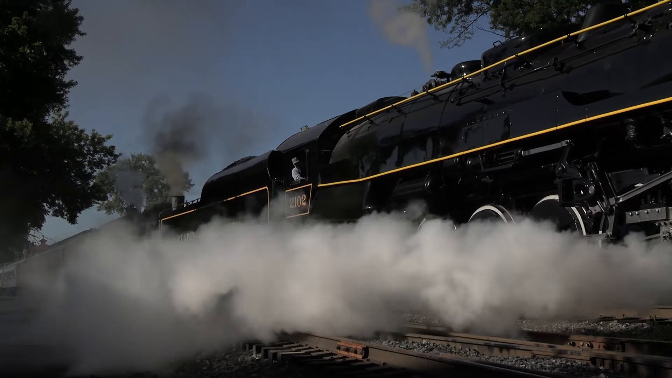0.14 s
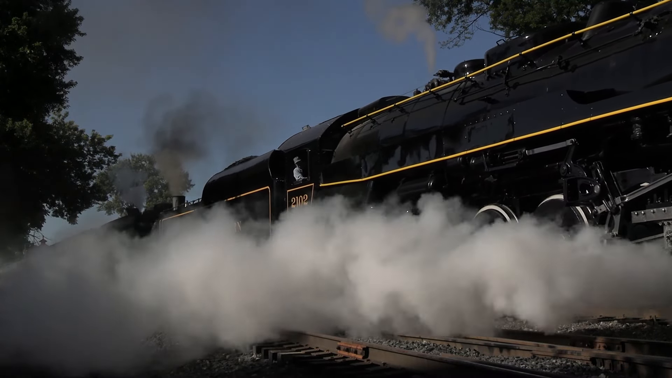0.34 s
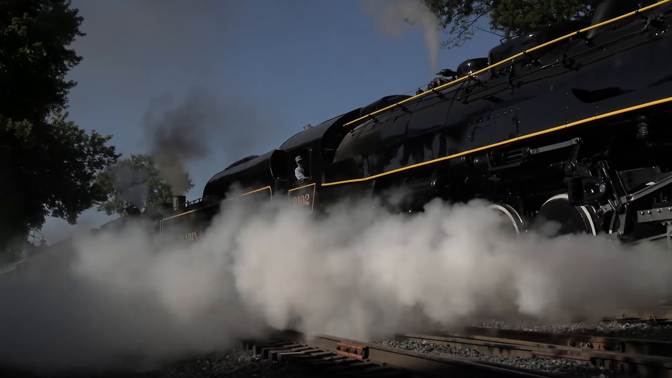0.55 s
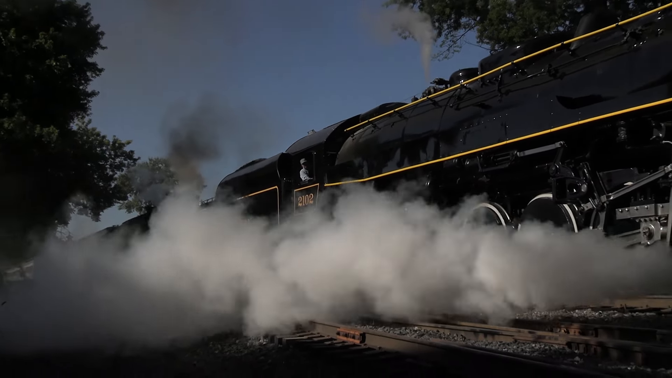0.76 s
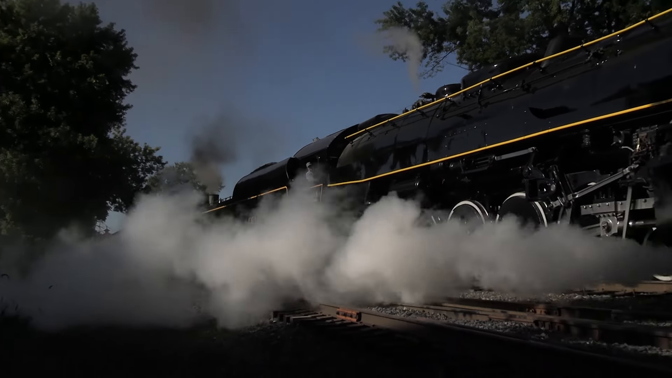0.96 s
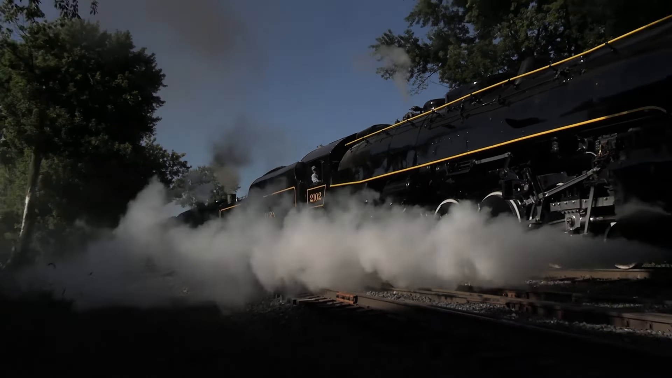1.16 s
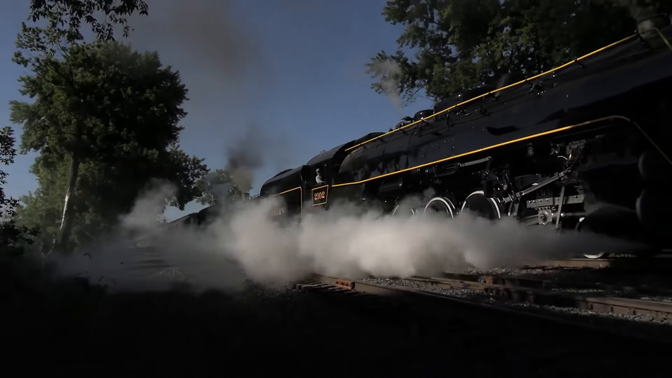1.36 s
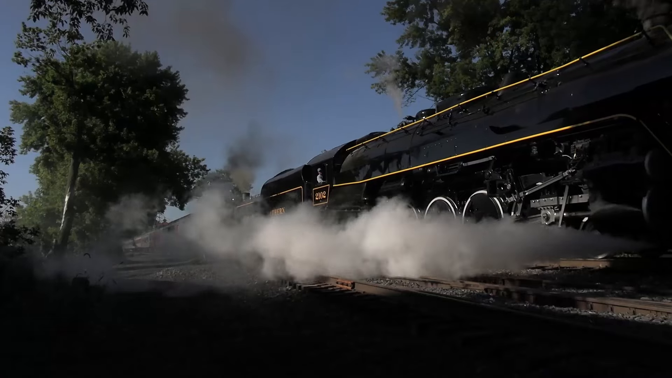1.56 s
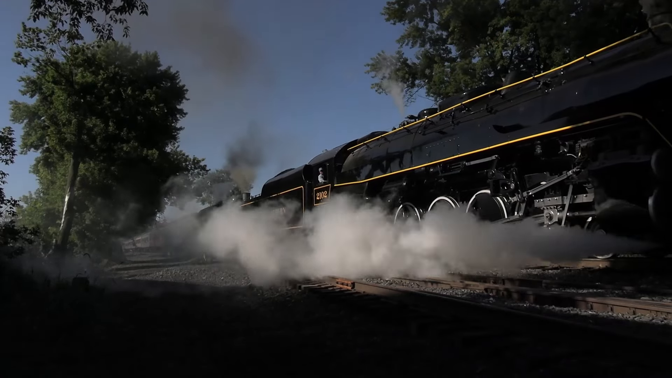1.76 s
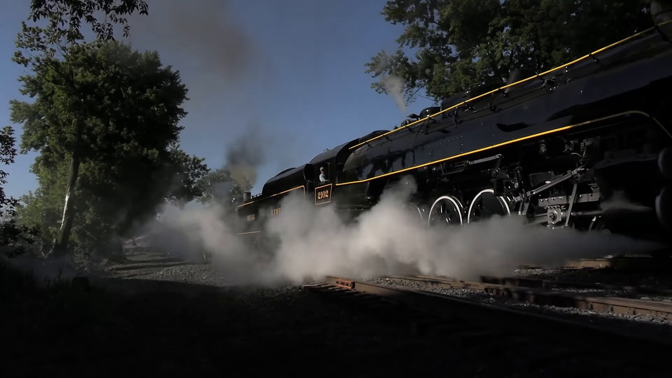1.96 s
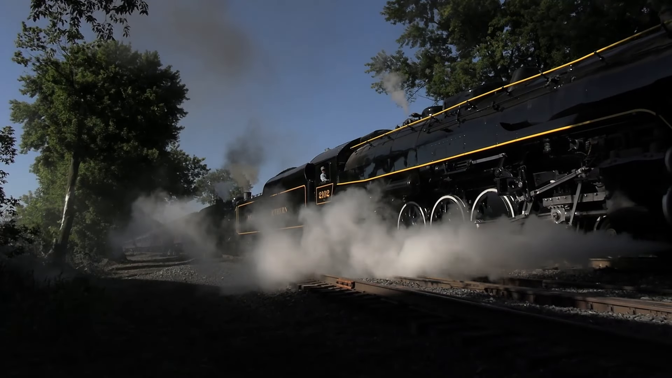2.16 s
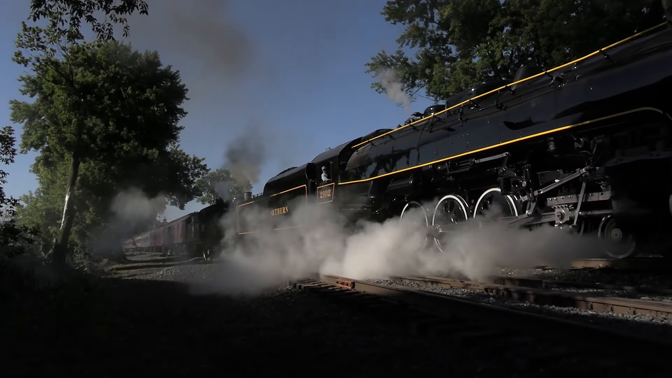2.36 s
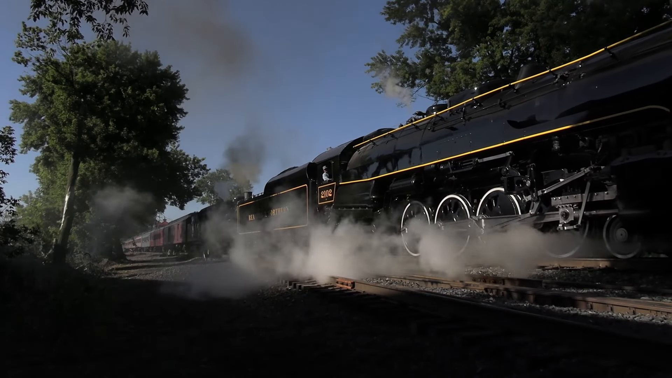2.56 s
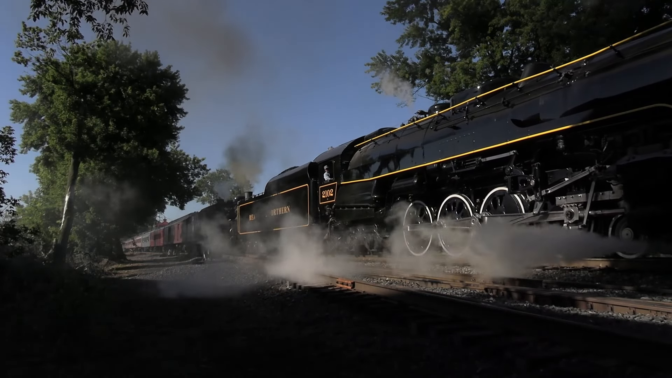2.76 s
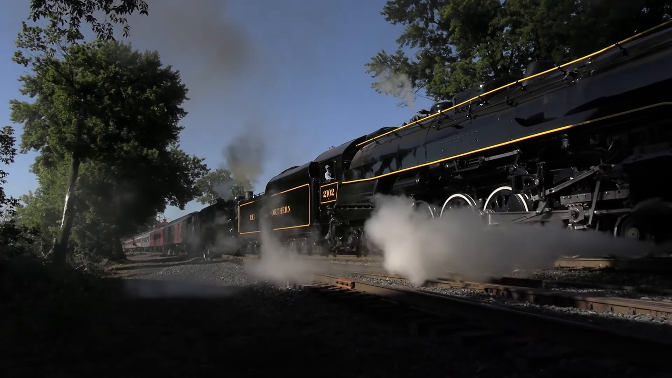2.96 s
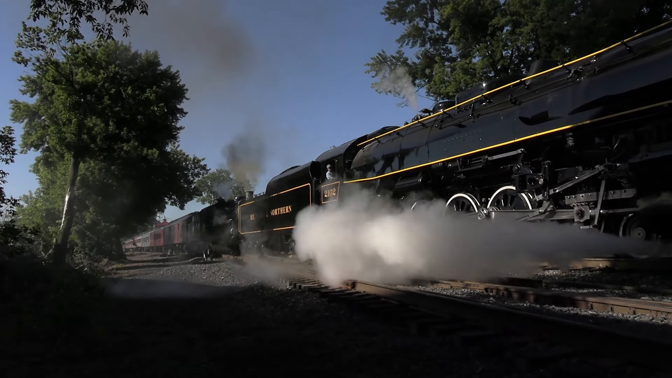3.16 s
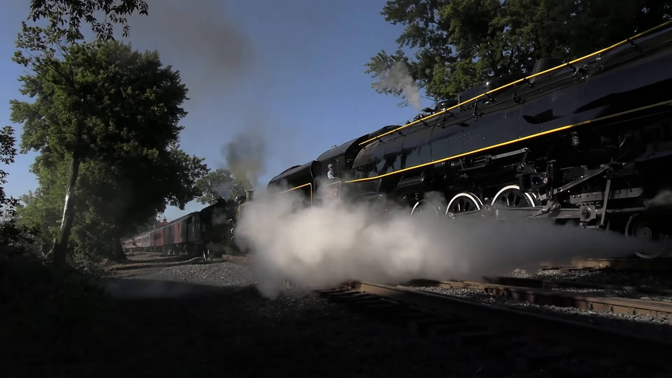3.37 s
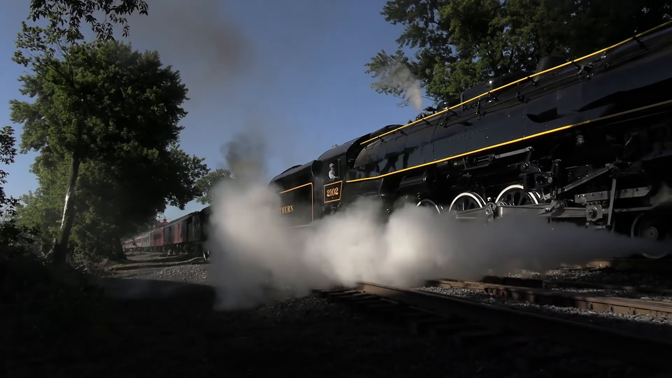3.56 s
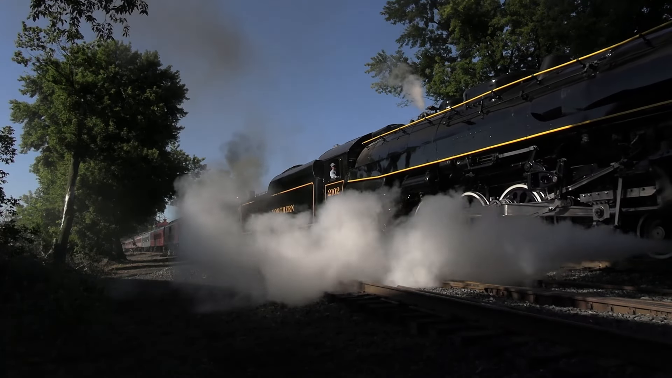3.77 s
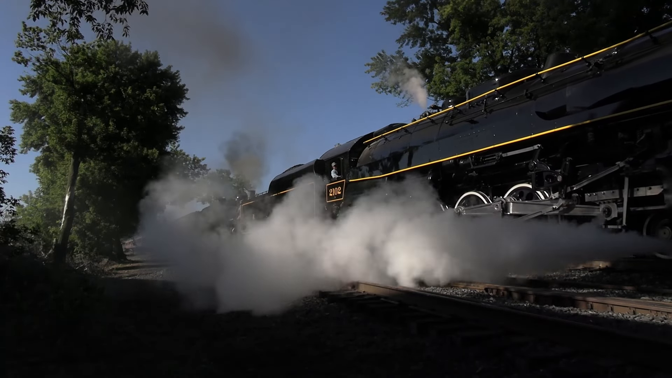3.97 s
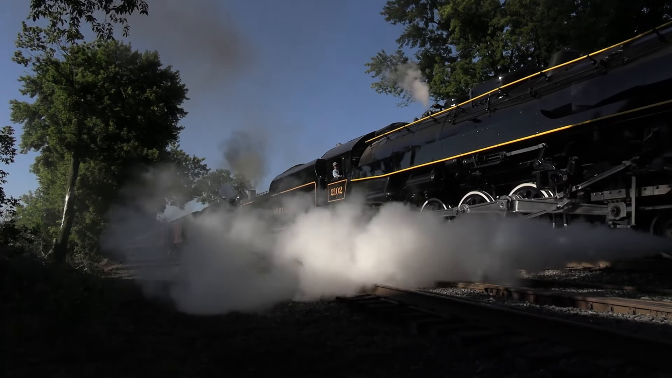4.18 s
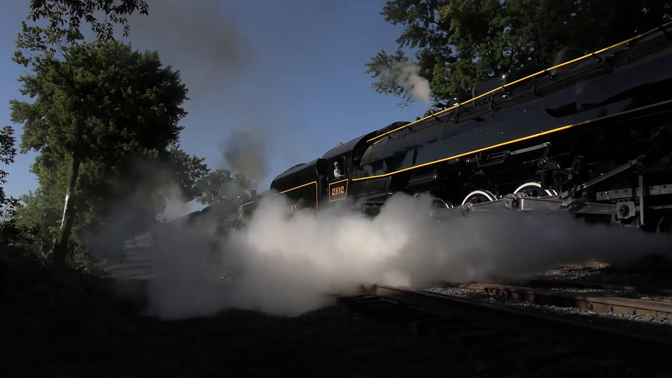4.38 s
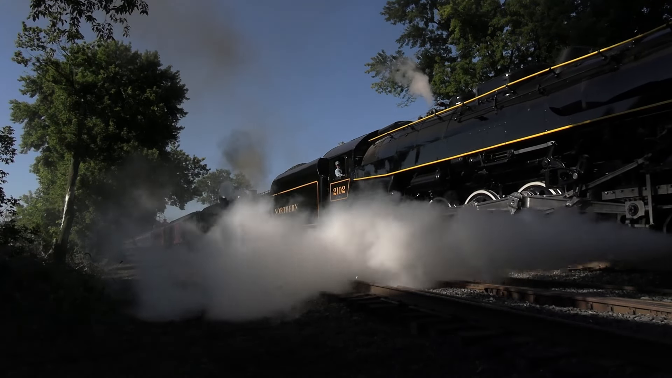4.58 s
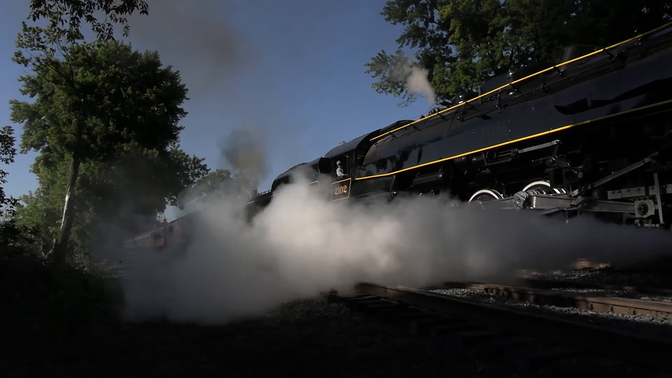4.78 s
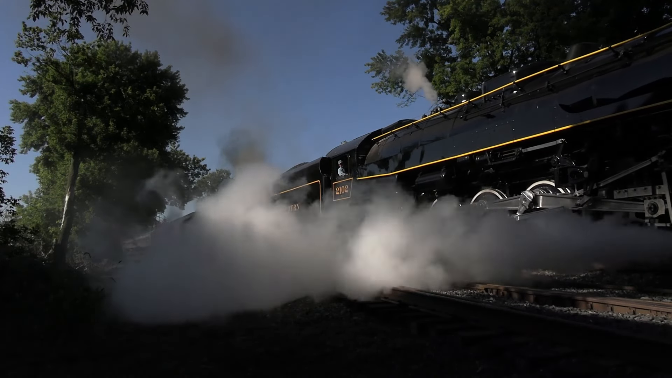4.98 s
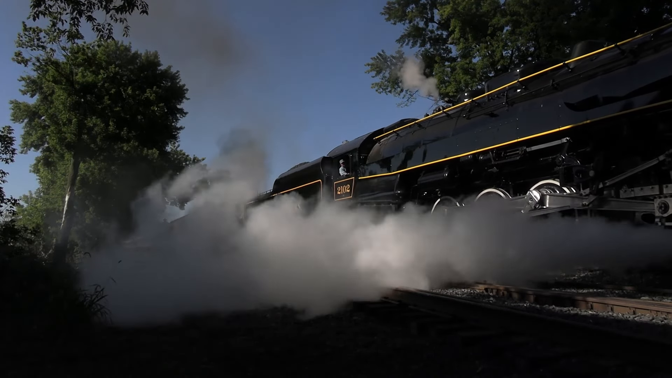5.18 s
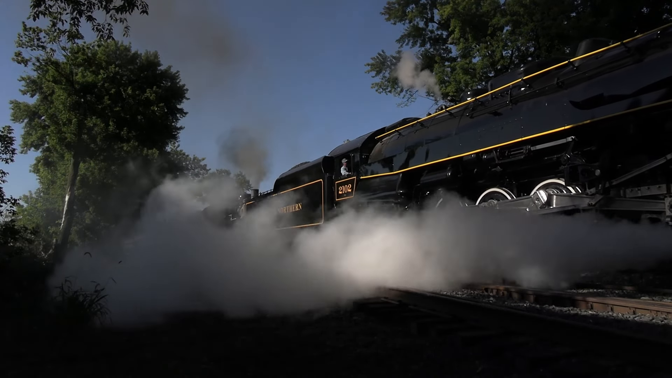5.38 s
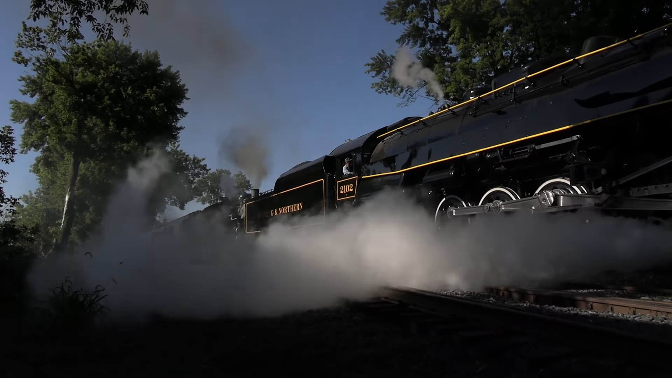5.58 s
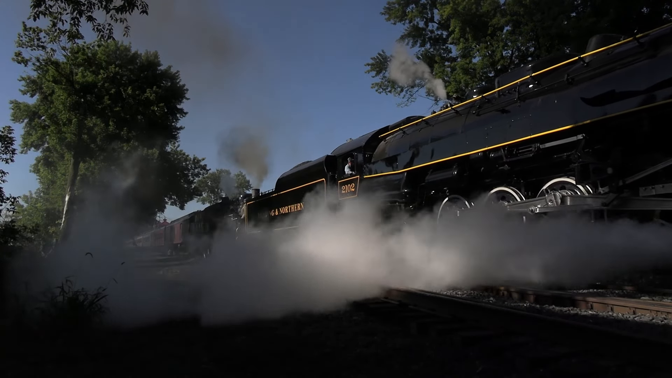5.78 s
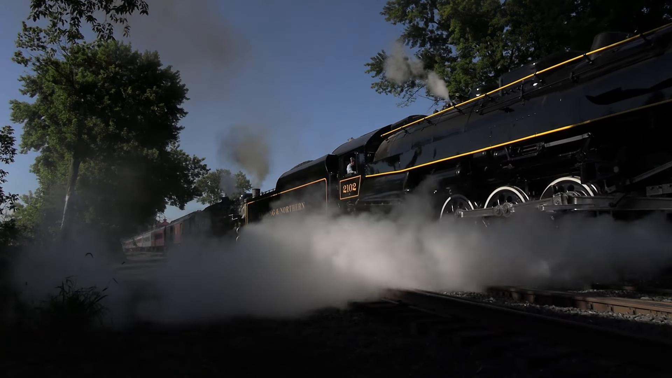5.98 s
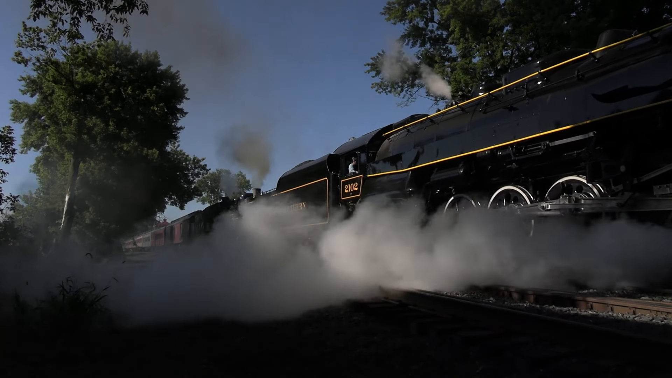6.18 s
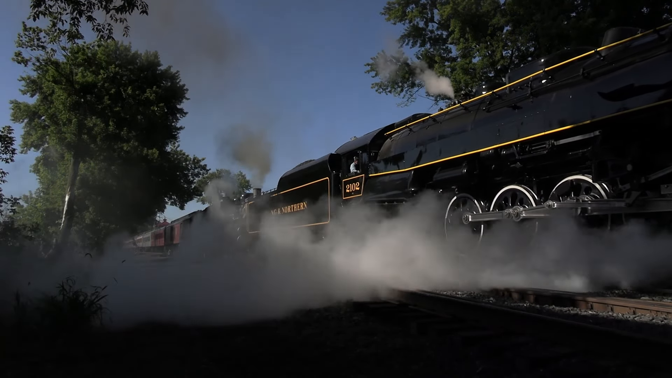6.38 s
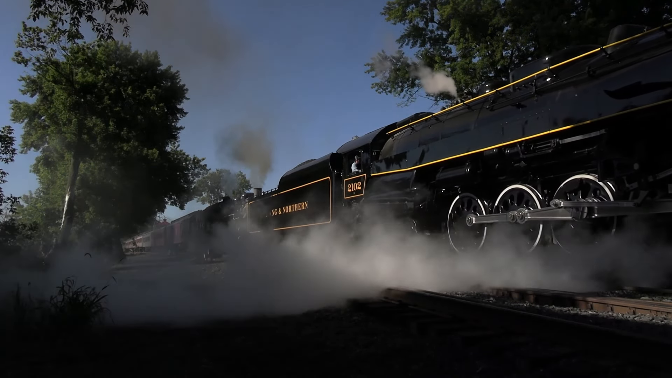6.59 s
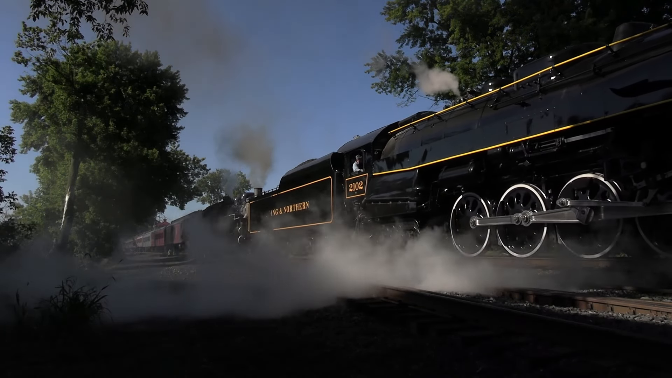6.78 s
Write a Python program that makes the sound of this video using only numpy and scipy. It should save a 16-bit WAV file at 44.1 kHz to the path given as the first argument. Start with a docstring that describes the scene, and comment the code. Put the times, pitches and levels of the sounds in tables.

```python
"""A steam locomotive creeps past with its cylinder cocks open, over the rumble of boiler and wheels.
First the rear cock blows: band-split turbulent noise, with running-gear knocks and a soft stack chuff.
Near 2.8 s the front cock opens with a whoosh; its jet surges, flickers and half whistles as the pressure sags.
Near 6.5 s a chuff sounds and the rear jet returns, until the end. Gliding echoes comb both jets throughout."""
import sys
import numpy as np
from scipy import signal
from scipy.fft import rfft, irfft
from scipy.io import wavfile
from scipy.ndimage import uniform_filter1d

SR = 44100
rng = np.random.default_rng(int(sys.argv[2]) if len(sys.argv) > 2 else 0)


def dump_mix(stems):
    """Bounce the given channels to the path in sys.argv[1] as a 16-bit WAV at rate SR."""
    frames = np.atleast_2d(stems).T  # one column per channel
    limited = np.clip(frames, -1, 1)  # hard clip at full scale
    pcm = np.round(limited * 32767).astype(np.int16)
    wavfile.write(sys.argv[1], SR, pcm)


N = 301644
TIME = np.arange(N) / SR
FREQS = np.maximum(np.fft.rfftfreq(N, 1 / SR), 1)

# Boiler and wheels, before the fixed gains of roar and hum: t/s, level/dB
RUMBLE_LEVEL = [(0.0, -62), (.4, -67), (.9, -72), (1.25, -68), (2.1, -73), (2.5, -68), (3.1, -69),
                (3.7, -70), (4.45, -66.5), (5.1, -72), (5.9, -71), (6.3, -75.5), (6.5, -73), (6.84, -62)]
# Relative spectral density of the rumble: f/Hz, level/dB
RUMBLE_SPECTRUM = [(25, -28), (50, -15), (85, -3), (150, 4), (260, -4.5), (340, 0), (450, 2.5), (700, -25)]
# Knocks of the running gear: t/s, level/dB, f/Hz, width/Hz, decay/s
GEAR_KNOCKS = [(.005, -58, 190, 90, .05), (.165, -61, 200, 90, .035), (.277, -35.5, 1730, 150, .016),
               (1.27, -68, 140, 80, .05), (2.315, -59, 335, 140, 0.025), (2.345, -63, 105, 40, .03),
               (2.945, -53, 360, 140, 0.017), (6.484, -45, 940, 150, 0.013), (6.49, -48, 1420, 120, .04)]
# Puffs of exhaust and the whoosh of a valve opening:
# t/s, level/dB, rise/s, decay/s, boom f/Hz, then boom, ring and bark re the puff/dB
PUFFS = [(2.185, -52, 0.15, 0.091, 204, -6, -6.5, -25), (2.755, -62, 0.045, 0.089, 142, -.5, -2.5, 16.5),
         (6.452, -53.3, 0.078, 0.12, 290, -5.5, -10.5, 2.5)]
# Relative spectral density of the puffs: f/Hz, level/dB
PUFF_SPECTRUM = [(40, -26), (85, -1.5), (150, -7), (330, 1.5), (490, 2.5), (600, -5), (1000, -12),
                 (1600, -30)]
# Stack and smokebox resonances, each applied twice: f/Hz, width of one pass/Hz, relative level/dB
STACK_MODES = [(129, 120, -6), (426, 62, 7)]
# Half whistles of the jet: t/s, length/s, f/Hz, width/Hz, level/dB
WHISTLE_TONES = [(0.08, .17, 3210, 650, -36.5), (.8, .2, 2950, 130, -44), (1.12, .3, 2870, 120, -46),
                 (3.12, 0.28, 3000, 600, -42), (4.7, 0.28, 2720, 380, -43.5), (5.35, 0.38, 2880, 200, -50),
                 (5.88, .35, 2920, 160, -48), (6.72, 0.3, 3370, 200, -55)]
# Strokes blown through each cock: opens t/s, closes t/s, hiss level/dB, hold/s, sag/(dB/s), most sag/dB
REAR_BLOWS = [(-.05, 2.79, -31, 0.18, 4, 7.5), (6.48, 7.0, -38.5, .5, 3.7, 7.4)]
FRONT_BLOWS = [(2.8, 6.48, -33, 1.75, 3.65, 9.5)]
# Relative spectral density of each jet before its bands are levelled: f/Hz, level/dB
REAR_SPECTRUM = [(40, -55), (260, -26), (340, -20), (440, -13.5), (560, -15.5), (750, -7.5), (900, -9),
                 (1150, -6), (1800, -4), (2450, -3), (3100, -1.5), (4500, -2.5), (6500, -3.5), (8500, -7),
                 (10700, -9), (16000, -25)]
FRONT_SPECTRUM = [(40, -64), (290, -23), (400, -17), (480, -18.5), (600, -10), (720, -11), (850, -7.5),
                  (1000, -4.5), (1200, -3.5), (1500, -2), (2000, 0.5), (2900, 1.3), (3400, -0.5),
                  (3800, -1), (4700, -3.5), (6600, -2.5), (8800, -7.5), (10900, -6.5), (13000, -15.5),
                  (16000, -23.5)]
# Paths to the two microphones: f/Hz, common share (0-1), left minus right level/dB, left lag/rad
REAR_STEREO = [(300, 1, 0, -0.3), (1100, 0.84, -2.5, -0.26), (2200, 0.38, -2, 0.34), (3180, 0.31, -4, 1),
               (4360, 0.2, -2.5, 0.058), (6700, 0.22, -4.5, 0.28), (10500, 0.62, -3, -0.58),
               (15000, .45, -2.5, -0.44)]
FRONT_STEREO = [(300, 0.75, -1.5, 0.14), (1100, 0.89, -1.5, 0.44), (2170, 0.8, -3, 1.2),
                (3200, 0.42, -5.5, 1.97), (4360, 0.044, -3, 1.3), (6400, 0.1, -8, 3.4),
                (8500, 0.52, -2, 5.2), (10500, 0.62, -4, 6.4), (15000, .6, -1, 6.5)]
# The rear cock swings to the right, then slightly back: t/s, left minus right level/dB
REAR_BALANCE = [(0, 1.5), (2.7, -0.5), (6.84, -0.2)]
# Gliding echo delays: t/s, ballast delay/ms, rail-bed delay/ms
REAR_GROUND = [(0, 2.6, 3.2), (1.2, 2.9, 3.22), (2.0, 2.1, 3.5), (2.7, 2.2, 3.5), (6.84, 3.8, 4)]
FRONT_GROUND = [(2.8, 2.7, 3.7), (3.5, 3.35, 3.7), (4.2, 3.4, 4.25), (5.0, 3.56, 4.45), (6.399, 3.9, 4.65)]
# Steady reflections close to the microphones: delay/ms, gain
CLOSE_REFLECTIONS = [(0.702, 0.017), (0.978, 0.056)]
# Drain pipes ringing under the jets: f/Hz, width/Hz, level re the plain hiss/dB
PIPE_MODES = [(1706, 40, -14), (2830, 100, -15), (3270, 140, -14)]
# Surges and chokes of the whole jet: t/s, length/s, level/dB
FLOW_SURGES = [(.07, 0.13, 0), (1.35, 0.34, 1), (1.72, 0.2, 1), (2.785, .04, -1), (2.848, 0.1, 3.5),
               (2.99, 0.034, -2), (3.24, .08, 0.5), (3.66, 0.19, -0.2), (4.1, 0.092, 2), (4.39, .05, 2),
               (4.46, .06, -1), (4.6, .05, 1), (4.7, 0.17, 2), (4.84, .05, 1), (5.04, 0.18, -0.8),
               (5.62, 0.36, 0.6), (5.85, 0.051, 2), (6.02, .05, 1), (6.11, .04, 0.8), (6.3, 0.53, -2.5)]
# Quick flickers of the fizz, mostly brighter and a few duller: t/s, length/s, fizz level/dB
FIZZ_FLICKERS = [(2.95, .03, 1), (3.26, 0.13, 2.5), (3.38, .04, 3.5), (3.47, .07, 3.5), (4.0, .05, 2.5),
                 (4.08, .07, 2), (4.21, 0.072, 3.5), (4.36, 0.063, 3), (4.67, 0.052, 2), (5.39, 0.12, 1.5),
                 (5.54, .05, 0), (5.77, .04, -1.5), (5.84, 0.038, -1.5), (5.92, 0.046, 1.5),
                 (6.01, .035, 1), (6.09, 0.047, 2), (6.17, 0.036, 1.5), (6.3, .05, 4.5)]
# The fizz dulls for a moment: t/s, length/s, level/dB
FIZZ_DULLINGS = [(2.33, 0.17, -3.2), (2.62, 0.46, -1.5), (2.795, .04, 0), (3.53, .05, -3),
                 (4.53, 0.24, -1.5), (5.14, 0.039, -4), (5.72, .06, -1.5), (5.8, .03, -1),
                 (5.97, .04, -2.5), (6.05, .03, -2), (6.23, .06, -0.5), (6.6, 0.37, -2)]
# The front jet sounds hollow for a while: t/s, length/s, f/Hz, width/Hz, level/dB
HOLLOW_BANDS = [(5.7, .7, 3800, 350, -3.5), (5.65, .45, 2650, 200, -2)]

VALVE_S = 0.1  # time that a valve takes to open or close
SIZZLE_SHARE = 0.45  # the upper hiss follows the fizz, dB per dB
TOP_DULLING = 1.3  # extra dip of the highest fizz, dB per dB
PUFF_FLUTTER_DB = 1.5  # spread of the ragged puff level
TOP_HZ = 15800  # upper limit of the sound


def undb(db):
    """Logarithmic law: level in decibels to amplitude gain."""
    return 10 ** (np.asarray(db) / 20)


def unit(x):
    """Normalization: the sound is scaled so that the mean of its channels has rms 1."""
    return x / np.std(np.atleast_2d(x).mean(axis=0))


def curves(rows):
    """Linear interpolation in time: each column gets one value a sample."""
    s, *columns = np.transpose(rows)
    return [np.interp(TIME, s, c) for c in columns]


def over_hz(rows):
    """Logarithmic frequency scale: (f/Hz, value) rows are joined along it."""
    hz, value = np.transpose(rows)
    return np.interp(np.log(FREQS), np.log(hz), value)


def shape(x, gain):
    """Linear filtering: each spectral component is multiplied by its gain."""
    return irfft(rfft(x) * gain, N)


def resonance(hz, width):
    """Damped resonance: the complex response has gain 1 at its centre."""
    return 1 / (1 + 1j * (FREQS ** 2 - hz ** 2) / (FREQS * width))


def walk(rate):
    """Smoothed random process: levels held 1 / rate s, slewed twice, spread 1."""
    k = int(SR / rate)
    held = np.repeat(rng.standard_normal(N // k + 1), k)
    return unit(uniform_filter1d(uniform_filter1d(held, k), k)[:N])


def stereo_noise(share):
    """Partial coherence: noise at two microphones has a share common to both."""
    share = np.clip(share, 0, 1)
    common = shape(rng.standard_normal(N), np.sqrt(share))
    separate = shape(rng.standard_normal((2, N)), np.sqrt(1 - share))
    return common + separate


def delayed(x, ms):
    """Propagation delay: both channels arrive late by a fixed or moving time."""
    place = np.arange(N) - ms * SR / 1000
    return np.array([np.interp(place, np.arange(N), channel, left=0) for channel in x])


def puff(start, rise, decay):
    """Transient envelope: linear growth, then exponential decay."""
    age = TIME - start
    return np.clip(age / rise, 0, 1) * np.exp(-np.maximum(age - rise, 0) / decay)


def swells(rows):
    """Gaussian modulation: smooth level changes in dB; length is the full width at 1/e."""
    return sum(db * np.exp(-(2 * (TIME - s) / length) ** 2) for s, length, db in rows)


def rumble(rumble_db=1, hum_hz=215, hum_width=8, hum_db=-9.0):
    """Broadband and resonant noise: the low roar of boiler and wheels, with a faint wavering hum."""
    level_db, = curves(RUMBLE_LEVEL)
    roar = unit(shape(stereo_noise(0.78), undb(over_hz(RUMBLE_SPECTRUM))))
    hum = unit(shape(stereo_noise(0.74), resonance(hum_hz, hum_width) ** 2))
    level = undb(level_db + 1.1 * walk(8))
    return level * (undb(rumble_db) * roar + undb(hum_db) * hum)


def knocks(rise_cycles=5.6):
    """Impact excitation: slack in the running gear takes up with dull thuds and short metallic knocks."""
    out = 0
    for s, db, hz, width, decay in GEAR_KNOCKS:
        tone = unit(shape(stereo_noise(0.98), resonance(hz, width) ** 2))
        out = out + undb(db) * puff(s, rise_cycles / hz, decay) * tone
    return out


def chuffs_and_whoosh(linger=3, ring_lag=2.4, bark_hz=760, bark_width=800, bark_rise=0.024):
    """Pulsed flow and resonance: each puff of gas has a boom, a bark and a slower, longer ring."""
    gas = unit(shape(stereo_noise(0.97), undb(over_hz(PUFF_SPECTRUM))))
    modes = sum(undb(db) * resonance(hz, width) ** 2 for hz, width, db in STACK_MODES)
    ring = unit(shape(stereo_noise(0.83), modes))
    bark = unit(shape(stereo_noise(0.79), resonance(bark_hz, bark_width) ** 2))
    flutter = undb(PUFF_FLUTTER_DB * walk(50))
    out = 0
    for s, db, rise, decay, boom_hz, boom_db, ring_db, bark_db in PUFFS:
        boom = undb(boom_db) * unit(shape(stereo_noise(0.92), resonance(boom_hz, boom_hz / 3) ** 2))
        body = (gas + boom) * flutter * puff(s, rise, decay)
        ringing = undb(ring_db) * ring * puff(s, ring_lag * rise, linger * decay)
        barking = undb(bark_db) * bark * puff(s, bark_rise, decay)
        out = out + undb(db) * (body + ringing + barking)
    return out


def whistles(waver_hz=70, waver_rate=11, flutter_db=2.0, left_db=-4):
    """Edge tone: steam over the lip of a cock sings in a breathy band of wandering pitch and level."""
    out = 0
    for s, length, hz, width, db in WHISTLE_TONES:
        band = unit(shape(stereo_noise(0.35), resonance(hz, width) ** 2))
        # a changing delay shifts the pitch
        drift_ms = 1000 * np.cumsum(waver_hz * walk(waver_rate)) / (SR * hz)
        level = undb(db + flutter_db * walk(30)) * swells([(s, length, 1)])
        out = out + level * delayed(band, drift_ms)
    return out * undb(np.array([[left_db], [-left_db]]) / 2)


def blow(strokes):
    """Expansion of steam: the valve opens, pressure holds, then sags; returns gain and dB of sag."""
    power, spent_db = 0, 0
    for opens, closes, db, hold, sag_db_per_s, most_db in strokes:
        valve = np.clip(.5 + np.minimum(TIME - opens, closes - TIME) / VALVE_S, 0, 1)
        sag_db = np.clip(sag_db_per_s * (TIME - opens - hold), 0, most_db)
        power = power + valve * undb(db - sag_db) ** 2
        spent_db = spent_db + valve * sag_db
    return np.sqrt(power), spent_db


def at_microphones(spectrum, path):
    """Stereo cues: level, phase and coherence between two microphones vary with frequency."""
    hz, *columns = np.transpose(path)
    share, shade_db, lag = (over_hz(np.column_stack([hz, c])) for c in columns)
    left = undb(shade_db) * np.exp(-1j * lag)
    # the spectrum is that of both microphones together
    together = np.sqrt(1 + abs(left) ** 2 + 2 * np.clip(share, 0, .95) * left.real)
    pair = np.array([left, np.ones_like(left)])
    return shape(stereo_noise(share), pair * undb(over_hz(spectrum)) / together)


def ground(x, echoes, ballast=0.06, rail_bed=-0.11, dull_hz=4500):
    """Comb interference: dull echoes add to the hiss, and the comb moves as their delays glide."""
    ballast_ms, rail_bed_ms = curves(echoes)
    dull = shape(x, 1 / np.sqrt(1 + (FREQS / dull_hz) ** 4))
    near = sum(gain * delayed(dull, ms) for ms, gain in CLOSE_REFLECTIONS)
    return x + near + ballast * delayed(dull, ballast_ms) + rail_bed * delayed(dull, rail_bed_ms)


def off_metal(x, gain=0.1, glint_hz=7, count=12):
    """Scattering: wheels, rods and frames return drifting echoes that come and go behind the steam."""
    paths = rng.uniform((1.1, -.4), (6.5, .4), (count, 2))  # delay/ms, drift/(ms/s)
    out = 0
    for k, (ms, drift) in enumerate(paths):
        sides = np.array([[1], [(-1) ** k]])  # every other echo is reversed on the right
        moving_ms = ms + drift * (TIME - TIME.mean())
        out = out + sides * walk(glint_hz) * delayed(x, moving_ms)
    return gain * out


def jet(strokes, spectrum, path, echoes, roar_db, fizz_db, roar_per_sag, fizz_per_sag, flutter_db, sputter_db):
    """Turbulent jet: low roar, middle hiss and high fizz; roar and fizz fade less than the hiss."""
    flow, sag_db = blow(strokes)
    pipe = 1 + sum(undb(db) * resonance(hz, width) for hz, width, db in PIPE_MODES)
    direct = shape(at_microphones(spectrum, path), pipe)
    steam = ground(direct, echoes) + off_metal(direct)

    low = 1 / (1 + (FREQS / 1300) ** 8)
    high = 1 / (1 + (7500 / FREQS) ** 8)
    roar, hiss, fizz = (unit(shape(steam, band)) for band in (low, 1 - low - high, high))
    sizzle = shape(hiss, 1 / (1 + (4800 / FREQS) ** 8))  # upper part of the hiss
    top_fizz = shape(fizz, 1 / (1 + (11500 / FREQS) ** 12))  # upper part of the fizz

    dips_db = swells(FIZZ_DULLINGS)
    flicker_db = swells(FIZZ_FLICKERS) + dips_db + sputter_db * walk(32)
    roar = roar * undb(roar_db + roar_per_sag * sag_db + 0.62 * walk(27.91))
    lower_hiss = (hiss - sizzle) * undb(flutter_db * walk(30))
    sizzle = sizzle * undb(SIZZLE_SHARE * flicker_db + flutter_db * walk(30))
    fizz = fizz - top_fizz + top_fizz * undb(TOP_DULLING * dips_db)
    fizz = fizz * undb(fizz_db + fizz_per_sag * sag_db + flicker_db)
    surge = undb(swells(FLOW_SURGES) + 0.21 * walk(14))
    return flow * surge * (roar + lower_hiss + sizzle + fizz)


def hollowed(x):
    """Band attenuation: narrow bands of the hiss sink and come back."""
    for s, length, hz, width, db in HOLLOW_BANDS:
        x = x + (undb(swells([(s, length, db)])) - 1) * shape(x, resonance(hz, width))
    return x


def cylinder_cocks():
    """Alternating discharge: the valve hands the steam from the rear cock to the front one and back."""
    swing_db, = curves(REAR_BALANCE)
    rear = jet(REAR_BLOWS, REAR_SPECTRUM, REAR_STEREO, REAR_GROUND, roar_db=-15.0, fizz_db=-8.0,
               roar_per_sag=0.14, fizz_per_sag=0.19, flutter_db=0.43, sputter_db=0.66)
    front = jet(FRONT_BLOWS, FRONT_SPECTRUM, FRONT_STEREO, FRONT_GROUND, roar_db=-12.5, fizz_db=-7.5,
                roar_per_sag=0.13, fizz_per_sag=0.65, flutter_db=0.67, sputter_db=0.97)
    return rear * undb(np.array([swing_db, -swing_db]) / 2) + hollowed(front)


def scene():
    """Superposition: the engine's sounds lie behind the steam jets."""
    return rumble() + knocks() + chuffs_and_whoosh() + whistles() + cylinder_cocks()


def record(dry):
    """Band limitation: a steep elliptic low-pass removes the extreme treble."""
    return signal.sosfilt(signal.ellip(10, .1, 80, TOP_HZ, fs=SR, output="sos"), dry)


dry = scene()
out = record(dry)
dump_mix(out)
```